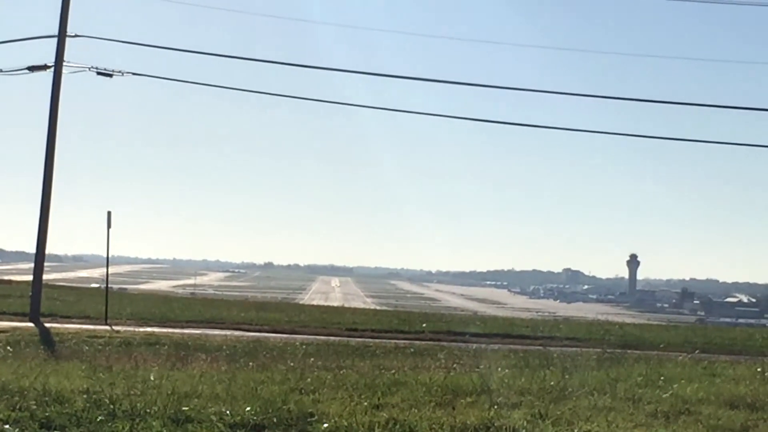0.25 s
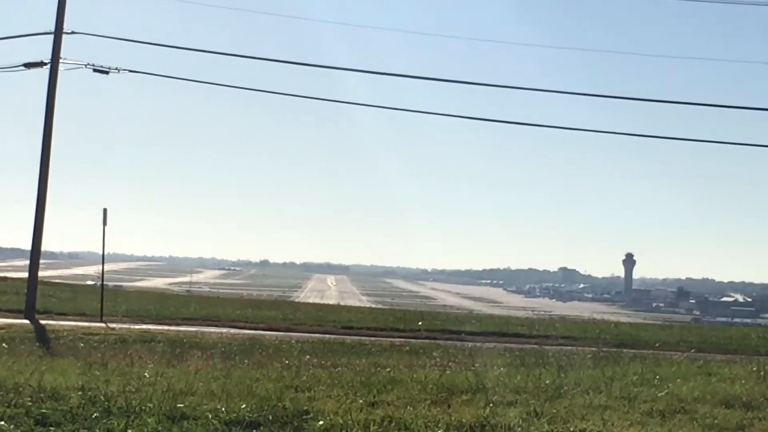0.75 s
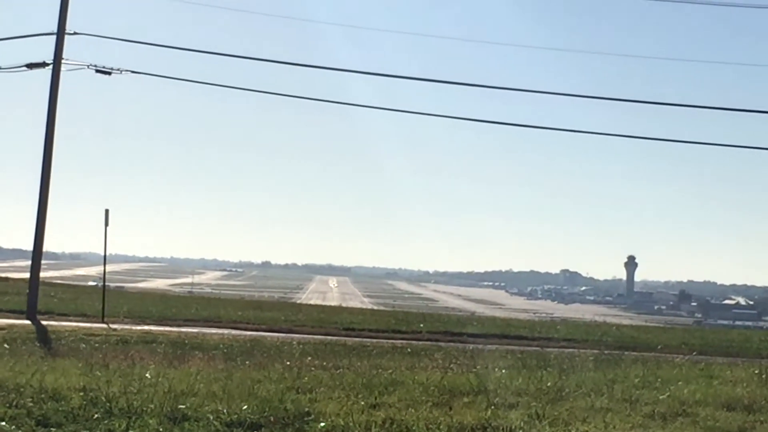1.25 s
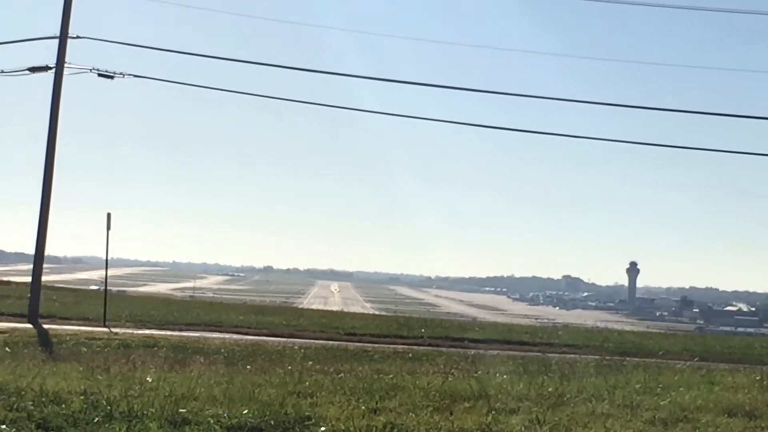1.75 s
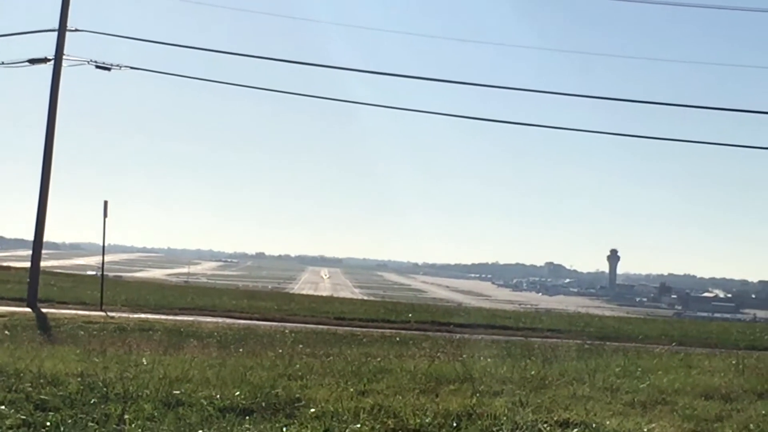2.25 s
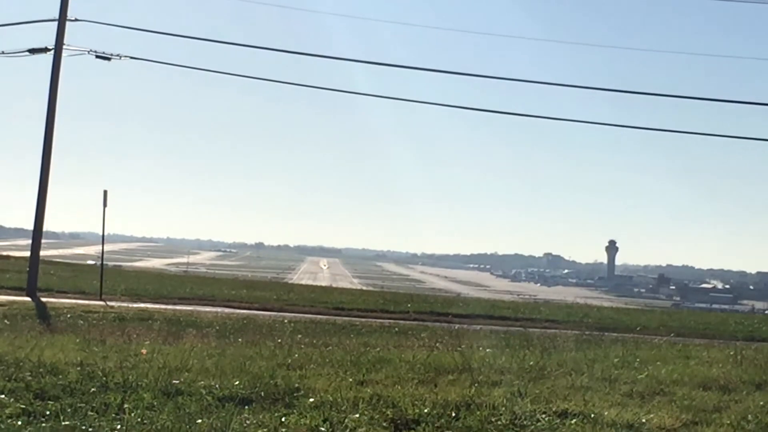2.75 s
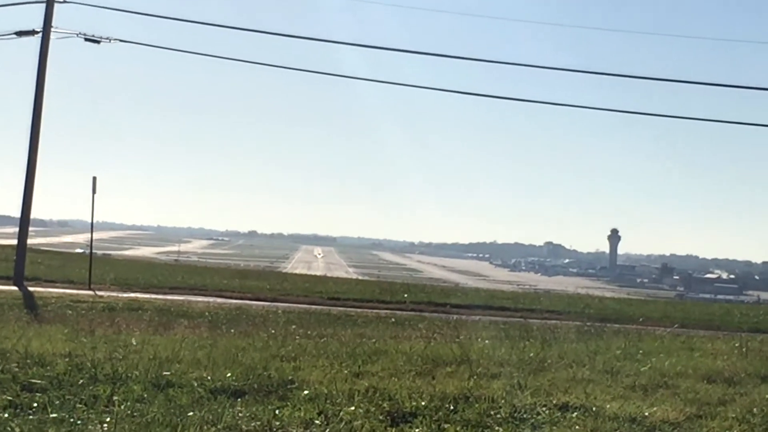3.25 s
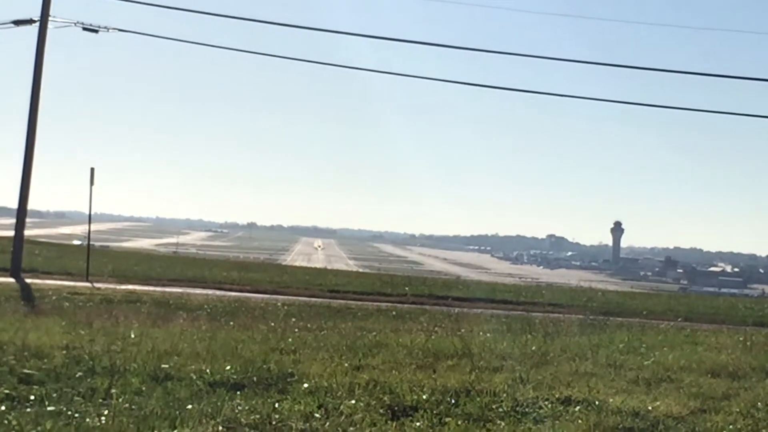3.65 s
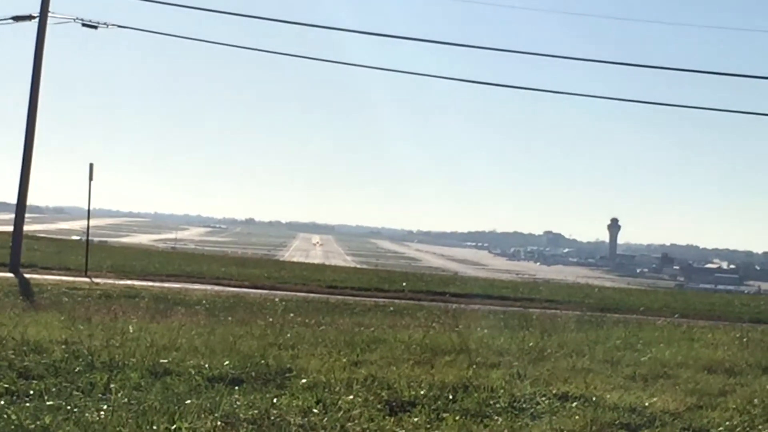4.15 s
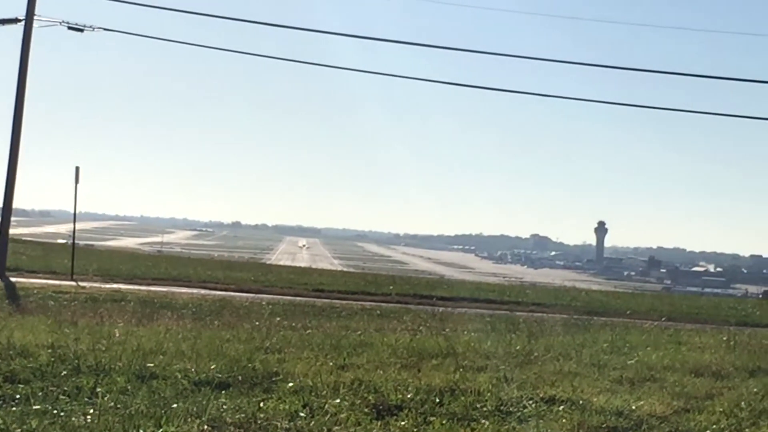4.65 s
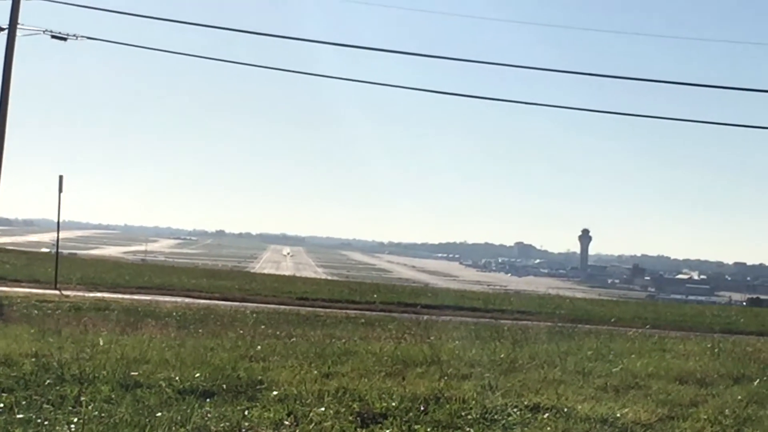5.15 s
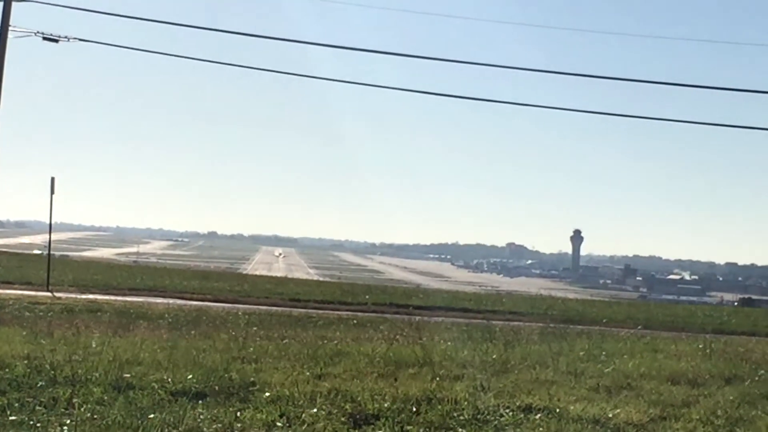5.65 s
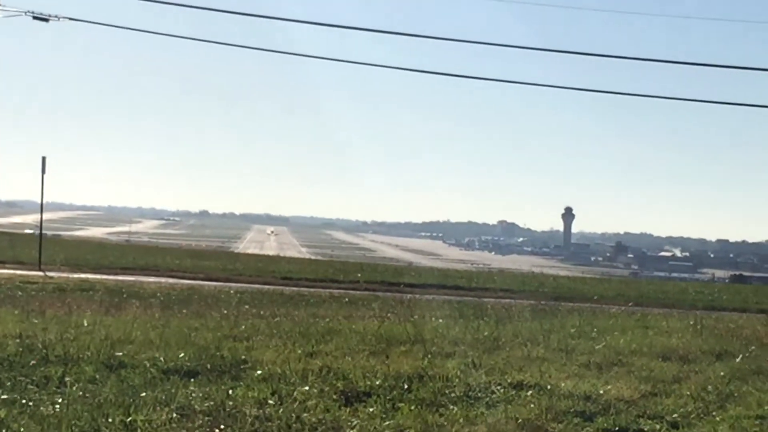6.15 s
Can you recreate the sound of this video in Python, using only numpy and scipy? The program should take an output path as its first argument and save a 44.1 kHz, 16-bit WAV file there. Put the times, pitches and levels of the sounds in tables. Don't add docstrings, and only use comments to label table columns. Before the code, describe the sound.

Far airliner engines roar deep and dull across an open airfield, with pulsing crickets, tiny bird chips, handling clicks, and finally three quick wren phrases.

```python
import sys
import numpy as np
from scipy import signal
from scipy.fft import rfft, irfft, next_fast_len
from scipy.io import wavfile
from scipy.ndimage import uniform_filter1d, map_coordinates

SR = 44100
rng = np.random.default_rng(int(sys.argv[2]) if len(sys.argv) > 2 else 0)


def pcm_store(signal):
    levels = np.round(np.clip(np.atleast_2d(signal), -1, 1) * 32767)
    wavfile.write(sys.argv[1], SR, levels.astype(np.int16).T)


def how_loud(loudness_db):
    steps = np.asarray(loudness_db, float) / 20
    return 10 ** steps


N = 282240
T = np.arange(N) / SR

# [t/s, level/dB]
ROAR_LEVEL = [(0.0, -42), (0.16, -37), (0.21, -44), (0.3, -37.5), (.55, -38.5), (.75, -43), (1.19, -44),
              (1.41, -41.5), (1.99, -45), (2.9, -42), (2.97, -38.5), (3.15, -46), (3.3, -41.5), (4.3, -43),
              (4.42, -39), (4.52, -44.5), (5.8, -42.5), (5.9, -39.5), (6.22, -43.5), (6.4, -42)]
# [f/Hz, density/dB per Hz]
ROAR_SPECTRUM = [(12, -40), (20, -36.5), (58, -1.5), (86, 2), (115, -0.5), (157, -11), (260, -19.5),
                 (340, -40.5), (570, -120)]
RUSH_SPECTRUM = [(88, -40.5), (150, 1), (188, -1), (248, -6.5), (346, -0.5), (381, -6.5), (419, -4.5),
                 (466, -6.5), (532, -2.5), (651, -2.5), (900, -6), (1320, -17), (1430, -20.5), (1610, -22),
                 (2600, -36.5), (3380, -66), (5720, -120)]
# [t/s, f/Hz, level/dB]
FAN_WHINE = [(1.7, 1340, -72.5), (2.3, 1383, -70), (2.9, 1417, -70), (3.45, 1453, -67), (3.6, 1460, -86)]
# [t/s, f/Hz, level/dB]
BLADE_HUM = [(.7, 510, -70), (1, 532.3, -58), (1.5, 605.3, -59.5), (2.2, 650, -55), (2.7, 714.4, -55),
             (3.1, 732, -72)]
# [t/s, half length/s, level/dB]
LOW_HUM_CHANGES = [(.05, .2, 0.5), (.68, 0.11, -16), (1.5, 0.58, -9), (2.44, 0.22, -26), (3.32, 0.22, -16),
                   (4.7, 0.55, -26), (5.5, 0.55, 5), (5.9, .14, -14)]
# [t/s, half length/s, level/dB]
HIGH_HUM_SWELLS = [(.85, 0.24, 11), (1.84, 0.27, 8.5), (3.32, 0.27, 9), (5.3, 0.36, 9), (5.85, 0.19, 10)]

# [t/s, length/s, level/dB]
NEAR_CRICKET = [(0.198, .044, -69), (0.432, .04, -68.5), (.659, .05, -65), (0.891, .053, -63.5),
                (1.135, .058, -63), (1.366, .056, -62.5), (1.6, .048, -62.5), (1.8046, .053, -58),
                (2.0634, .058, -59.5), (2.302, .043, -58), (2.539, .071, -62), (2.752, .072, -59),
                (3.026, .065, -57.5), (3.257, .065, -56), (3.458, .061, -53), (3.693, .067, -54.5),
                (3.925, .06, -55), (4.163, .062, -58), (4.391, .068, -58.5), (4.686, .05, -59),
                (4.904, .064, -57.5), (5.135, .064, -58.5)]
# [t/s, level/dB]
FAR_CRICKET = [(0.0, -68.5), (.2827, -68.5), (.5276, -68.5), (.762, -67.5), (1.0256, -68.5), (1.2973, -70),
               (1.555, -67), (1.826, -66), (2.077, -68), (2.333, -72), (2.604, -71), (2.858, -70),
               (3.0999, -71), (3.3259, -70), (3.556, -69), (3.8295, -69.5), (4.0803, -69), (4.3137, -69),
               (4.5407, -71), (4.7667, -69), (5.0239, -73.5), (5.281, -70.5), (5.5363, -69),
               (5.7814, -68.5), (6.0607, -69), (6.2788, -70.5)]
THIN_CRICKET = [(.13, -73), (.68, -76), (.95, -71), (1.18, -73), (1.501, -68), (2.17, -73), (4.82, -75),
                (5.42, -72), (5.67, -71), (5.955, -68), (6.17, -73)]
HIGH_CRICKET = [(1.03, -77), (1.29, -73), (1.56, -82), (1.83, -74), (2.31, -73), (2.55, -73), (2.8, -79),
                (3.06, -76), (3.33, -74), (3.59, -72), (3.86, -78), (4.1, -76), (4.34, -77), (4.59, -91),
                (5.14, -73), (5.43, -76), (5.68, -78), (5.96, -73)]

# [t/s, length/s, start f/Hz, end f/Hz, level/dB]
WREN_SONG = [(4.74, .045, 4170, 4520, -69), (4.787, 0.038, 2910, 2984, -53.5),
             (4.834, 0.023, 3280, 3200, -58), (4.879, 0.024, 2635, 2263, -54.5),
             (4.961, .032, 3720, 3660, -55), (5.003, 0.092, 2804, 2570, -50),
             (5.214, 0.049, 4090, 4200, -64), (5.263, 0.036, 2946, 2970, -54),
             (5.311, 0.021, 3330, 3195, -53.5), (5.357, 0.028, 2700, 2120, -55),
             (5.436, 0.062, 3680, 3700, -58.5), (5.482, 0.097, 2792, 2535, -51),
             (5.689, .055, 4130, 4410, -65.5), (5.735, 0.04, 2900, 2990, -64),
             (5.783, 0.05, 3390, 3120, -61), (5.835, .028, 2680, 2060, -57.5),
             (5.912, 0.056, 3680, 3710, -54.5), (5.958, 0.1, 2765, 2510, -52.5)]
WREN_BEND = (90, 0, 0, 20, 115, -40)
# [t/s, length/s, f/Hz, level/dB]
SHORT_CALLS = [(1.376, 0.022, 4300, -62.5), (1.459, 0.025, 4350, -58), (1.549, 0.024, 4310, -61.5),
               (3.225, .02, 4600, -71), (3.323, .028, 4650, -73), (4.082, 0.013, 4620, -77),
               (4.172, 0.018, 4630, -69), (4.274, 0.018, 4300, -62), (4.348, 0.021, 4330, -61),
               (4.426, .029, 4350, -59), (5.408, 0.016, 4570, -66), (6.264, 0.017, 4630, -66),
               (6.311, 0.023, 4730, -63), (6.368, .02, 4780, -62)]
CALL_SHAPE = (1.008, 1.003, .955)
# [t/s, length/s, start f/Hz, end f/Hz, level/dB]
STRAY_NOTES = [(.25, .025, 7900, 7850, -75), (.3, 0.035, 3750, 3620, -76), (0.874, 0.041, 3450, 3720, -70),
               (0.91, 0.06, 3080, 2820, -68), (0.923, .035, 6550, 5850, -69),
               (1.052, 0.047, 3800, 3450, -67.5), (1.152, 0.02, 2830, 2810, -65),
               (5.098, 0.017, 2570, 2540, -54), (5.297, .03, 2950, 2960, -63),
               (5.756, .035, 3650, 3500, -71), (5.775, .052, 2990, 3060, -62.5),
               (5.422, .05, 3200, 3200, -72), (5.62, 0.056, 2600, 2600, -75),
               (6.063, 0.05, 2560, 2640, -71), (6.323, .03, 4000, 4300, -75)]
# [t/s, peak level/dB, centre f/Hz]
BIRD_CHIPS = [(0.2124, -57.5, 5760), (0.6594, -60, 6300), (0.7751, -53, 5330), (2.8444, -56, 5320),
              (4.258, -54, 5300), (4.6753, -66, 6500), (5.3214, -54.5, 5400), (6.3678, -55.5, 5270)]
# [t/s, peak level/dB, body f/Hz]
SHORT_TICKS = [(.4143, -54, 4500), (.4146, -56, 3000), (.415, -57, 8800), (.4152, -60, 6500),
               (.4153, -38, 850), (.4156, -48, 2100), (.4232, -58, 4200), (.426, -53, 1800),
               (.4203, -41, 2900), (.4206, -53, 5500), (.4209, -35, 2000), (.4219, -42, 1850),
               (.4238, -56, 2300), (.4308, -55, 2600), (.431, -51, 5800), (.4313, -57, 7200),
               (.4358, -49, 2200), (.4359, -35, 1050), (.556, -60, 2800), (1.228, -56, 2400),
               (1.384, -52, 2300), (1.3842, -60, 5000), (1.503, -57, 2600), (1.5032, -63, 4500),
               (3.2635, -66, 9000), (3.312, -66, 11000), (3.4715, -59, 6500), (3.4725, -63, 12000),
               (3.496, -60, 6000), (3.4975, -61, 12500), (3.5045, -63, 13000), (3.515, -61, 5500),
               (3.7065, -63, 11000), (3.9325, -66, 11000), (3.98, -60, 3500), (4.4044, -67, 11000),
               (4.975, -60, 3000), (5.0085, -61, 4200), (5.965, -62, 4000), (6.015, -60, 9000),
               (6.368, -66, 11000), (6.3989, -44, 13500)]

# [f/Hz, density/dB per Hz]
FAR_HISS = [(1500, -120), (2300, -2.5), (3200, 1), (5000, -3.5), (7500, 0.5), (9300, -5), (10300, -11.5),
            (12300, -9), (14900, -12.5), (15300, -60)]
# [t/s, level over the murmur/dB]
LOWER_GROUP = [(.06, 10), (.3, 7), (.48, 6), (.65, 9), (.8, 7), (1.14, 10), (1.39, 5), (1.6, 8), (1.75, 0),
               (2.1, 11), (2.42, 3), (2.64, 6), (2.85, 10), (2.98, 8), (3.18, 7), (3.46, 8), (3.64, 5),
               (3.96, 8), (4.2, 3), (4.28, 16), (4.69, 8), (4.98, 7), (5.2, 13), (5.33, 11), (5.49, 9),
               (5.72, 10), (5.98, 14.5), (6.22, 11), (6.4, 12)]
UPPER_GROUP = [(0.0, 10), (.21, 7), (.57, 7), (.8, 10), (1.14, 7), (1.6, 5), (2.1, 4), (2.64, 9), (2.8, 11),
               (3.08, 8.9), (3.47, 9), (3.72, 12), (3.96, 11), (4.21, 9), (4.28, 8), (4.44, 8.8), (4.69, 7),
               (4.94, 8.9), (5.03, 14), (5.3, 8.6), (5.6, 11.7), (5.93, 8), (6.22, 9)]
# [f/Hz, t60/s]
FIELD_DECAY = [(1500, 0.16), (4000, 0.43), (9000, 0.04)]


def jet():
    roar_db, = curves(ROAR_LEVEL)
    rush_db = -49.5 - 0.3 * (T - T.mean()) + 0.049 * (roar_db - roar_db.mean())
    roar = noise(lambda hz: how_loud(along(ROAR_SPECTRUM, hz)), patchy_db=-2.0)
    swell = uniform_filter1d(uniform_filter1d(roar ** 2, size=SR // 14), size=SR // 14)
    roar = how_loud(roar_db) * unit(roar / np.abs(swell) ** 0.35)
    rush = noise(lambda hz: how_loud(along(RUSH_SPECTRUM, hz)), patchy_db=1.8)
    rush = how_loud(rush_db + 0.51 * wobble(2.94)) * rush

    low_hum = glide(542 + 3 * wobble(2.4), blur=0.31, rate=14)
    low_hum = how_loud(-57 + bumps(LOW_HUM_CHANGES)) * low_hum
    high_hum = glide(802 + 2 * wobble(1.8), blur=0.25, rate=13)
    high_hum = how_loud(-67.5 + bumps(HIGH_HUM_SWELLS)) * high_hum

    whine_hz, whine_db = curves(FAN_WHINE)
    blade_hz, blade_db = curves(BLADE_HUM)
    whine = how_loud(whine_db) * glide(whine_hz, blur=0.61, rate=21)
    blades = how_loud(blade_db) * glide(blade_hz, blur=0.99, rate=45)
    return roar + rush + low_hum + high_hum + whine + blades


def crickets():
    out = np.zeros(N)
    for s, length, db in NEAR_CRICKET:
        sound = chirp(length, 8480, period=0.00787, duty=0.656, overtone_db=-20, shy_db=15.5)
        add(out, s - 0.0024, how_loud(db + 3.5) * sound)
    for s, db in FAR_CRICKET:
        sound = chirp(0.072, 8240, period=0.0093, duty=0.736, overtone_db=-39, tiring=0.0035, blur=0.56)
        add(out, s - 0.0028, how_loud(db + 5.5) * sound)
    for s, db in THIN_CRICKET:
        add(out, s, how_loud(db) * chirp(0.045, 8740, period=0.0082, duty=0.6, overtone_db=-42))
    for s, db in HIGH_CRICKET:
        sound = chirp(0.057, 9400, period=0.0085, duty=0.49, overtone_db=-40)
        add(out, s - 0.012, how_loud(db - 4.5) * sound)
    return out


def chirp(length, hz, period, duty, overtone_db, tiring=0, shy_db=5, blur=0.13):
    duration = np.ceil(length / period - 0.45) * period
    stroke, u = np.divmod(np.arange(round(duration * SR)) / SR, period)
    luck = rng.standard_normal((16, 4))[stroke.astype(int) % 16]
    u = np.clip(u / (period * duty) - 0.046 * luck[:, 2], 0, 1)
    warmup = np.exp(-stroke / 0.9)
    effort = how_loud(-shy_db * warmup + 1.7 * luck[:, 0] - 0.31 * stroke)
    sag = 0.0027 * (shy_db + 2.5) * u ** 3
    flat = 0.0014 * shy_db * warmup + tiring * (stroke - 3)
    pitch = hz * (1.012 - sag - flat + 0.004 * luck[:, 3])
    phase = 2 * np.pi * np.cumsum(pitch) / SR + 3 * luck[:, 1] + blur * wobble(700, size=len(u))
    second_mode = 0.72 * np.sin(1.47 * phase)
    rasp = 2.2 * u ** 3 * rng.standard_normal(len(u))
    scrape = how_loud(overtone_db + 3 * luck[:, 2]) * (second_mode + rasp)
    return np.sin(np.pi * u) ** 0.62 * effort * (np.sin(phase) + scrape)


def wren_notes():
    notes = []
    for k, (s, length, start, end, db) in enumerate(WREN_SONG):
        middle = (start + end) / 2 + WREN_BEND[k % len(WREN_BEND)]
        notes.append((s, length, start, middle, end, db))
    return notes


def call_notes():
    calls = [(s, length, *np.multiply(hz, CALL_SHAPE), db) for s, length, hz, db in SHORT_CALLS]
    strays = [(s, length, a, (a + b) / 2, b, db) for s, length, a, b, db in STRAY_NOTES]
    return sorted(calls + strays)


def whistles(notes, clear_db, rate):
    pitch, level, blur = np.zeros((3, 2, N))
    for k, (s, length, *hz, db) in enumerate(notes):
        u = np.linspace(0, 1, round(length * SR))
        start = round(s * SR)
        span = k % 2, slice(start, start + len(u))
        pitch[span] = np.polyval(np.polyfit([0.15, 0.5, 0.85], hz, 2), u)
        edges = np.minimum(u / 0.009, (1 - u) / 0.007) * length
        level[span] = how_loud(db + 0.53 - 3.6 * u) * np.clip(edges, 0, 1)
        blur[span] = 0.1 + (clear_db - db) / 13
    out = np.zeros(N)
    for k in range(2):
        unsteady = pitch[k] * (1 + 0.006 * wobble(55))
        out += level[k] * glide(unsteady, blur[k], rate)
    return out


def chips():
    out, t = np.zeros(N), np.arange(round(0.03 * SR)) / SR
    for s, db, hz in BIRD_CHIPS:
        burst = np.sin(np.pi * np.clip(t / 0.0056, 0, 1) ** 0.52) ** 1.3
        trail = 0.12 * np.abs(wobble(400, size=len(t))) * np.exp(-t / 0.014)
        sweep = glide(hz * (1.42 - 0.6 * np.exp(-t / 0.0045)), blur=0.45, rate=500)
        add(out, s, how_loud(db + 1.5) * (burst + trail) * sweep)
    return out


def ticks():
    out, t = np.zeros(N), np.arange(round(0.015 * SR)) / SR
    for s, db, hz in SHORT_TICKS:
        decay = 1.6 * how_loud(-60 * t / 0.0062) + 0.3 * how_loud(-60 * t / 0.055)
        crack = uniform_filter1d(rng.standard_normal(len(t)), size=6) * decay
        ring = how_loud(-60 * t * hz / 12) * (1 - np.exp(-t * hz * 3)) * np.sin(2 * np.pi * hz * t)
        share = min(hz / 3500, 1) * min(how_loud(-49 - db), 1)
        add(out, s, how_loud(db) * (share * crack + ring))
    return out


def chorus():
    out = how_loud(-73.5) * noise(lambda hz: how_loud(along(FAR_HISS, hz)), patchy_db=1.84)
    # group, murmur level/dB, half length of a swell/s, centre and width f/Hz, strokes per second
    groups = ((LOWER_GROUP, -83.5, 0.06, 6800, 300, 105), (UPPER_GROUP, -84, 0.052, 7420, 420, 92))
    for group, murmur_db, half, hz, width_hz, rate in groups:
        level_db = murmur_db + bumps([(s, half, up) for s, up in group])
        strokes = np.cos(2 * np.pi * np.cumsum(rate * (1 + 0.0596 * wobble(4.9))) / SR)
        voices = noise(band(hz, width_hz), patchy_db=2.5)
        out = out + how_loud(level_db) * unit(how_loud(2.1 * strokes) * voices)
    return out


def field(x):
    out, step = np.zeros(N), SR // 4
    for i in range(0, N, step):
        hz, t, z = signal.stft(rng.standard_normal(SR // 2), SR, nperseg=256)
        decay = how_loud(-60 * t / along(FIELD_DECAY, hz)[:, None])
        tail = signal.istft(z * decay, SR, nperseg=256)[1]
        echo = signal.fftconvolve(x[i:i + step], tail / np.linalg.norm(tail))
        add(out, i / SR + 0.012, echo)
    return out


def glide(pitch_hz, blur, rate):
    size, share = len(pitch_hz), np.clip(blur, 0, 1)
    scramble = wobble(rate, size=size) + 1j * wobble(rate, size=size)
    air = np.sqrt(1 - share) + np.sqrt(share / 2) * scramble
    return np.real(air * np.exp(2j * np.pi * np.cumsum(pitch_hz) / SR))


def noise(gain, patchy_db=0):
    z = signal.stft(rng.standard_normal(N), nperseg=512)[2]
    patches = uniform_filter1d(rng.standard_normal(z.shape), size=5, axis=0)
    patches = uniform_filter1d(patches, size=12, axis=1)
    x = signal.istft(z * how_loud(patchy_db * unit(patches)), nperseg=512)[1][:N]
    m = next_fast_len(N + 8192)
    return unit(irfft(rfft(x, m) * gain(np.fft.rfftfreq(m, 1 / SR)), m)[:N])


def band(centre_hz, width_hz):
    return lambda hz: np.exp(-((hz - centre_hz) / width_hz) ** 2)


def wobble(rate, size=N):
    return map_coordinates(rng.standard_normal(int(N * rate / SR) + 4), [T[:size] * rate])


def bumps(rows):
    t = T[::64]
    total = sum(db * np.clip(1 - np.abs(t - s) / half, 0, 1) for s, half, db in rows)
    return np.interp(T, t, total)


def curves(rows):
    s, *cols = np.transpose(rows)
    return [np.interp(T, s, c) for c in cols]


def along(points, hz):
    f, v = np.transpose(points)
    return np.interp(np.log(hz + 1), np.log(f + 1), v)


def unit(x):
    return x / np.sqrt(np.mean(x ** 2) + 1e-20)


def add(track, s, sound):
    i = max(round(s * SR), 0)
    track[i:i + len(sound)] += sound[:len(track) - i]


def scene():
    wren = whistles(wren_notes(), clear_db=-53, rate=300)
    others = whistles(call_notes(), clear_db=-64, rate=420)
    chip, bugs = chips(), crickets()
    echoes = field(how_loud(-17) * wren + how_loud(-22) * others + how_loud(-14) * chip + how_loud(-14) * bugs)
    return (jet() + bugs + wren + others + chip + ticks() + chorus() + echoes)[None]


def roll_off(x):
    return signal.sosfilt(signal.butter(12, 15880, fs=SR, output="sos"), x)


def record(dry):
    m = next_fast_len(N + 8192)
    hz = np.fft.rfftfreq(m, 1 / SR)
    response = np.where(hz < 15250, 1, how_loud(-26))
    dull = irfft(rfft(dry, m) * response, m)[:, :N]
    return roll_off(dull)


dry = scene()
out = record(dry)
pcm_store(out)
```